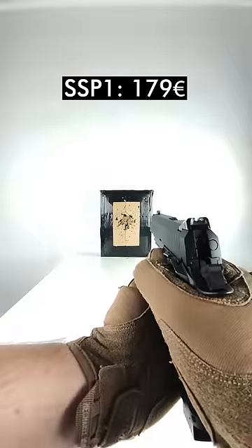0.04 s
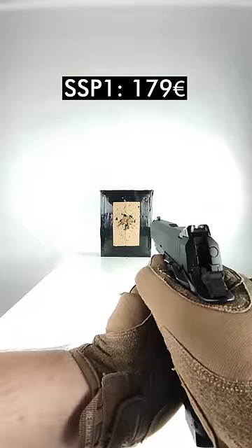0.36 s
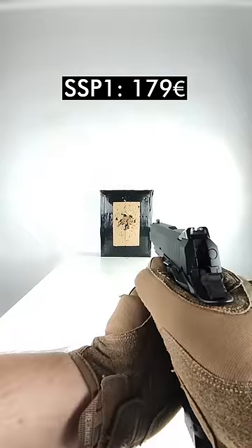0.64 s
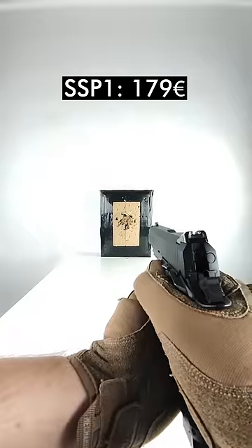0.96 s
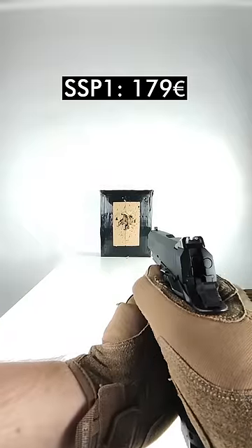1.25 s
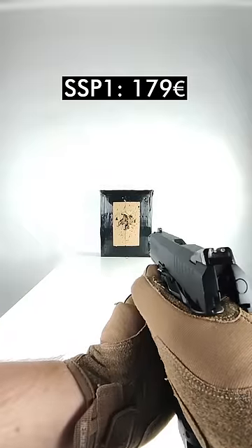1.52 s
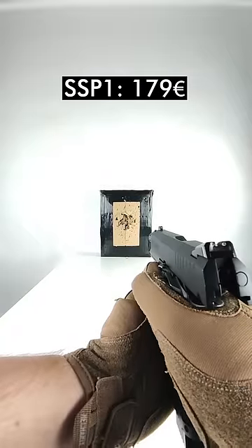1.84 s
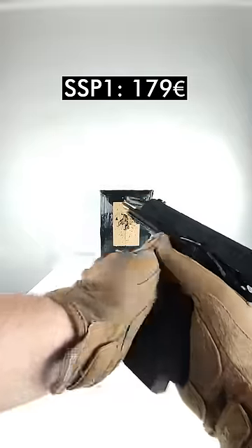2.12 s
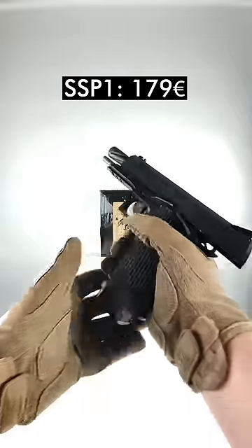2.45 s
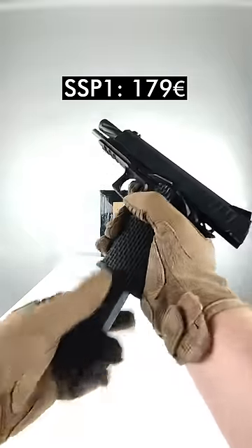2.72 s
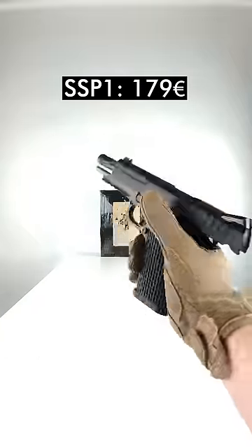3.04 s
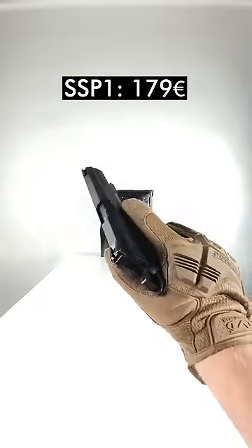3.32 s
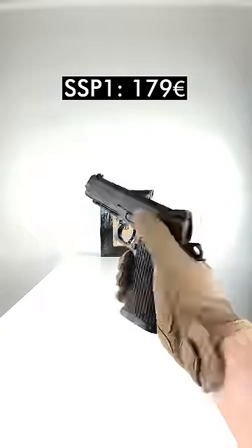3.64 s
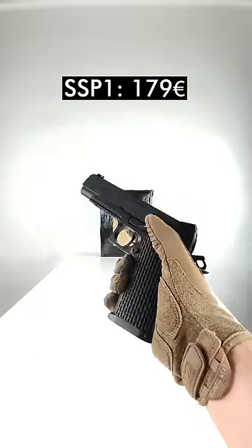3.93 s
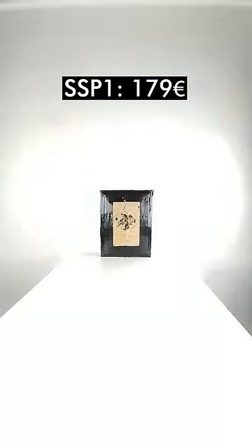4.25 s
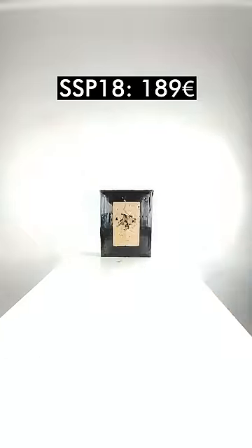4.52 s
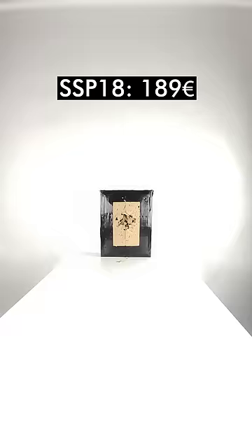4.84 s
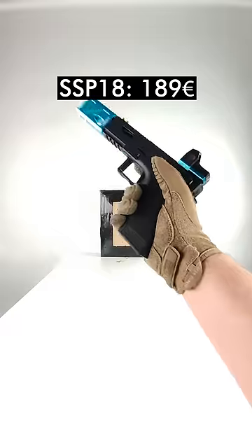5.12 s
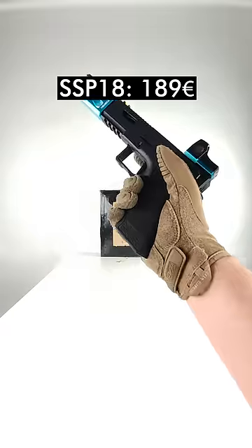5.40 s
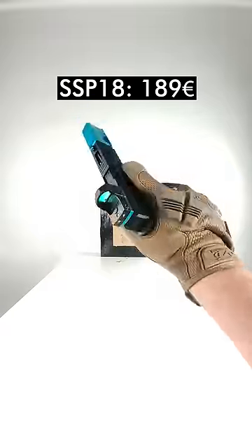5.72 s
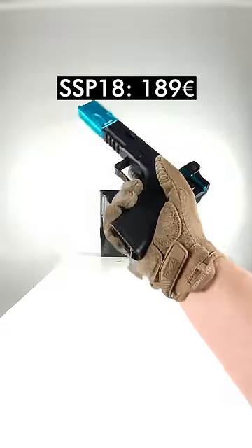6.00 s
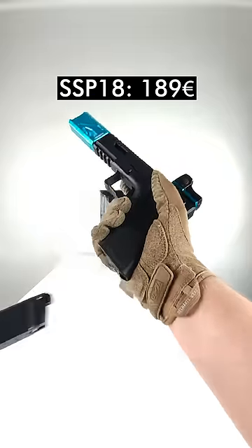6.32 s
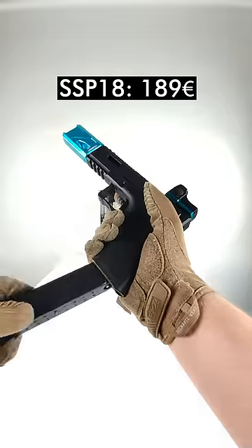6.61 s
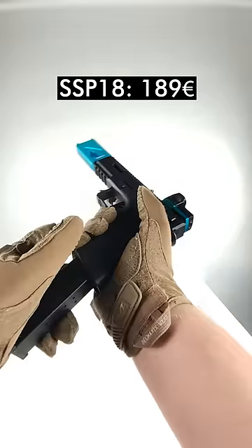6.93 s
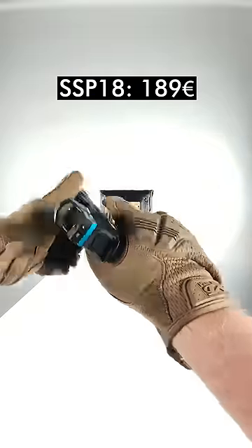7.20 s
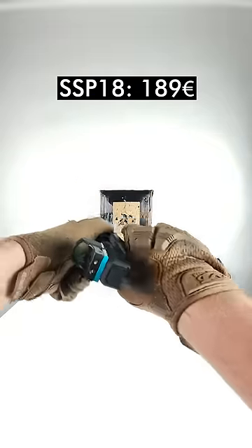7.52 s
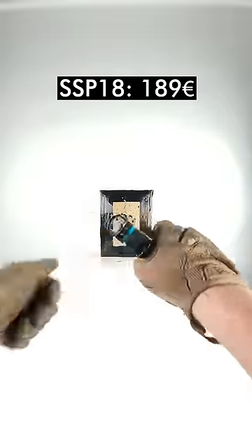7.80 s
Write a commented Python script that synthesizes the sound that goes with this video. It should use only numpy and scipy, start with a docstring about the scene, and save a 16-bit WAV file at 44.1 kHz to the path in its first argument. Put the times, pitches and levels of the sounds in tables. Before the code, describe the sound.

A low, quiet ventilation rumble fills a small room throughout. At about 1.1 seconds a gas-powered toy pistol fires close by with a sharp pop and a slide clack. The trigger resets with a dry click at 1.3 seconds, and a second shot pops at 1.5. From 2 to 3 seconds gloves rub and the magazine scrapes out with small clicks. At 3.3 seconds the slide snaps shut with a loud metallic clack and a brief room echo. Only faint rustles and ticks follow until about 6.5 seconds, as a second pistol is picked up. Its magazine knocks and scrapes into the grip from 6.6 seconds and locks with a loud click just before 7. The slide is pulled back with a quick cluster of clacks around 7.5 seconds and let go with another clack at 7.8.

```python
"""Gas-powered toy pistols, an arm's length away in a small room with rumbling ventilation.
First come two shots: each puff of gas bangs and throws the slide back, where it stays the second time.
Next the magazine rubs its way out and the slide snaps shut. Then a second pistol is picked up and its
magazine clicks in. Last, its slide is pulled back and let go. After each loud clack a limiter holds
the volume down for a moment, and then the room's ring jumps back up."""
import sys
import numpy as np
from scipy import signal
from scipy.fft import rfft, irfft
from scipy.io import wavfile
from scipy.ndimage import uniform_filter1d, minimum_filter1d

SR = 44100
rng = np.random.default_rng(int(sys.argv[2]) if len(sys.argv) > 2 else 0)


def to_wav(s):
    """Save 16-bit WAV."""
    ch = np.atleast_2d(s).T  # columns
    pcm = np.round(np.clip(ch, -1, 1) * 32767)  # PCM
    wavfile.write(sys.argv[1], SR, pcm.astype(np.int16))


N = 351036
HIT_SAMPLES = 8192
HIT_TIME_S = np.arange(HIT_SAMPLES) / SR

# In the tables, fade_s is the time to fall by 60 dB and decay_s the time to fall to about a third.
# pan_db is left minus right, bright_db adds treble, and room_db is how strongly a sound feeds the room.
# Tone of the ventilation: pitch_hz, relative_db
VENT_TONE = [(20, -1.5), (38, -4.5), (60, -20.5), (110, -17), (150, -15), (190, -17.5), (300, -18.5),
             (550, -20.5), (850, -29.5), (1200, -32), (2000, -38.5), (5000, -45.5), (10000, -49.5),
             (16000, -47.5)]
# The room's echo, band by band: pitch_hz, level_db, fade_s
ECHO_BANDS = [(60.75, -8, .36), (150, -6, 0.52), (300, -5.5, 0.44), (554, -7, 0.37), (990, -12.5, 0.31),
              (2000, -11, 0.26), (3960, -7.5, 0.24), (9100, -13, 0.22), (11000, -5.5, 0.14),
              (16000, -14.5, .15)]
# Pitches that the walls boost or weaken: pitch_hz, width_hz, boost_db
STANDING_WAVES = [(152.2, 5, 11), (257, 18, 1.5), (323, 12, 5.5), (405, 9.8, 8), (488.3, 75, 3),
                  (535, 38, 2), (623, 22, 4), (782, 22, 4.5), (860, 13, -4.5)]
# Tone of sliding surfaces: pitch_hz, relative_db
RUB_TONE = [(200, -14), (800, -4.5), (1400, 5), (1800, 1.5), (2500, 3), (3700, -0.5), (4600, -2),
            (7000, 1.5), (9200, 4), (10500, -6), (16000, -14.5)]
# Gloves, magazine and slide rubbing along: middle_s, length_s, level_db, bright_db
RUB_STROKES = [(2.04, 0.093, -55.5, -5), (2.377, .13, -52.5, -6), (2.698, 0.046, -49.5, -11),
               (2.746, .06, -41.5, 4.5), (2.837, 0.069, -48, 4), (2.909, 0.074, -54.5, 1),
               (3.073, 0.12, -58.5, -6), (4.28, 0.14, -67, 4.5), (4.93, 0.11, -66, -9),
               (5.201, 1, -72.5, -2), (6.234, 0.12, -66.5, 4), (6.449, 0.32, -67, 5),
               (6.65, 0.021, -47.5, 0), (6.874, .065, -59.5, -6), (6.927, 0.07, -39, 6),
               (7.136, 0.052, -60.5, -2), (7.277, 0.23, -61, -0.5), (7.506, 0.047, -54, -1),
               (7.783, 0.077, -48, 2.5)]
# Clacks that jolt the whole pistol: start_s, level_db, decay_s, pan_db
PISTOL_JOLTS = [(1.3055, -18, 0.0028, 24), (3.288, 0.5, 0.018, 4), (6.9645, -7.5, 0.0094, 4.5),
                (7.547, -9, .011, 1.5), (7.827, -17, 0.011, 5)]
# Tone of the pistol's frame, also used for the gas hiss: pitch_hz, relative_db
FRAME_TONE = [(60, -10), (250, -1.5), (520, 0.5), (800, -2.5), (1400, -1.5), (2500, -1), (4500, 0.5),
              (7000, -2), (9200, 1.5), (10500, -6.5), (16000, -9)]
# Ringing notes of slide and barrel: pitch_hz, level_db, fade_s
METAL_NOTES = [(1760, -39, .08), (2350, -34, .08), (2620, -37, .07), (3260, -36, .1), (3850, -37, .08),
               (4420, -37, .08), (5320, -37, .08), (6000, -33, .08), (6430, -33, .09), (7240, -37, .1),
               (7980, -36, .08), (9200, -34, .08)]
# Kinds of clack, each named for one part that sounds like it; the first is any sharp, dry click of
# the action (the firing mechanism): knock_db, rise_s, fade_s, list of peaks (pitch_hz, boost_db)
CLACK_KINDS = {"hammer": (0.82, 0.00054, 0.013, [(1200, 3), (8900, 0.5)]),
               "slide": (0, 0.00056, 0.014, [(7000, 1.5), (9400, 2)]),
               "chamber": (-19, 0.00025, .015, [(2950, 11), (4300, 3.5), (6200, 11), (9300, 8)]),
               "barrel": (-18, 0.00061, 0.014, [(1720, 15.5)]), "catch": (-4, .001, 0.0083, [(4200, 0.5),
               (5900, 5)]), "grip": (6.5, .0006, 0.028, [(1370, 16.5)]),
               "well": (5.4, 0.00061, 0.014, [(2500, 4.5)]), "magazine": (-18, 0.0013, 0.012, [(1800, 3.5),
               (2400, 8), (6400, 3)]), "frame": (-13.5, 0.00058, 0.016, [(1800, 4), (3250, 4.5),
               (6300, 2.5)])}
# Parts knocked together by a spring or a hand: start_s, kind, level_db, bright_db, room_db, pan_db
# The row at 1.306 s is the action: a sharp, dry click as the trigger resets.
HANDLING_CLACKS = [ (1.113, "slide", 3, 4, 1.5, 3), (1.306, "hammer", -16, 6.5, -7.5, -1),
                   (1.319, "catch", -43, 6, -6, 0), (1.489, "catch", -52, -8, 2, -4.5),
                   (1.496, "catch", -43.5, -3, -9, -4), (1.941, "catch", -35.5, 1, 2, -3),
                   (1.964, "catch", -37.5, -9.5, -12, -1.5), (2.08, "catch", -27, 7, -2.5, 0.5),
                   (2.5728, "catch", -47.5, -2, 7, -7), (2.698, "grip", -41, -11, 1, -1),
                   (2.7954, "grip", -31, -12, -5, .5), (2.809, "grip", -34.5, -6.5, .5, 3),
                   (2.849, "grip", -26.5, -8, -10, -2), (2.898, "catch", -40, -13, 1.5, -6),
                   (2.907, "catch", -34.5, -6, -6, 3), (3.2166, "catch", -37, 2.5, 4.5, 2),
                   (3.2532, "chamber", -24.5, -0.5, 10, -0.5), (3.2708, "chamber", 5.5, 5.5, 2.5, -0.5),
                   (3.2873, "slide", 4.5, 10.5, -7.5, 2), (3.713, "grip", -42.5, -10, 5, -6),
                   (3.728, "grip", -37, 5, -1, 0.5), (4.174, "catch", -43, -7.5, -1, -3),
                   (4.2458, "catch", -48, -20, -7, -2), (5.116, "catch", -53.5, -9, 0, 0),
                   (5.2913, "catch", -49.5, -13, 4, -1), (5.5835, "catch", -51, -6.5, 10, 4),
                   (5.661, "catch", -49.5, 2.5, 5, -2.5), (5.6818, "magazine", -48, -13, -1, 7),
                   (6.0754, "catch", -37, -9, 3.5, 2.5), (6.5964, "well", -30.5, -8.5, -13, 0),
                   (6.602, "well", -26, -14, 0, 1), (6.633, "magazine", -35.5, -11, -6, 0),
                   (6.6572, "well", -21.5, -9, -10, -2), (6.6701, "magazine", -11, -6.5, -4.5, 0),
                   (6.699, "well", -32.5, -9, 6, -1), (6.8943, "magazine", -32.5, -10, -6.5, 1.5),
                   (6.912, "well", -26, 1, -10, -1.5), (6.9402, "magazine", -4.5, 4.5, -7.5, 0.5),
                   (6.946, "catch", -14.5, 6, -16, -2), (6.9627, "magazine", 3, -3, -6.5, 3.5),
                   (7.061, "magazine", -38, -4, -1, 0), (7.312, "catch", -47, -1, 3, 2),
                   (7.489, "chamber", -34.5, 6, -5, -2.5), (7.504, "catch", -34, -3, 10, 0),
                   (7.5192, "chamber", -15, 6.5, 2, 0.5), (7.5296, "barrel", -12.5, -3, -22, -1),
                   (7.546, "frame", -4, 0.5, -1.5, 0.5), (7.5493, "frame", -2, 2, -11, 1.5),
                   (7.567, "frame", -19, -8, 3, 6), (7.8, "frame", -34, 1, 15, -2),
                   (7.814, "chamber", -17, 5, 14, 0), (7.8266, "frame", -5, -0.5, -4.5, 2)]
# With each shot the trigger moves, the hammer is freed and hits the gas valve, and the slide flies back:
# after_bang_s, kind, level_db, bright_db, room_db, pan_db
SHOT_CLACKS = [(-.021, "grip", -43.5, -1.5, -4.5, -1.5), (-.013, "hammer", -29.5, -2, 0, -4),
               (-.0083, "hammer", -7.5, 3, -2, -0.5), (.0085, "slide", 4.5, 7, 5.5, 0)]
# Tone of the gas leaving the barrel: pitch_hz, relative_db
BANG_TONE = [(60, 9.5), (160, 2), (280, 8), (420, 5.5), (550, 5), (760, 9), (1050, 6.5), (1400, 2.5),
             (2200, -1.5), (5000, -8.5), (9000, 5.5), (10500, -7), (16000, -17.5)]
# The shots: start_s, bang_db, fade_s, hiss_db, thump_db, thump_decay_s, thump_pan_db
GAS_SHOTS = [(1.0715, 6, 0.055, -6, -4, .017, 10), (1.546, 5, 0.096, -6, 5, 0.015, 3)]


def gain(db):
    """Turn decibels into a number to multiply by."""
    return 10 ** (np.asarray(db) / 20)


def pitches(size):
    """The pitches in Hz that make up a sound of this many samples."""
    return np.maximum(np.arange(size // 2 + 1) * SR / size, 1)


def curve(points, hz):
    """Join (pitch, value) points with straight lines on a musical scale."""
    points = np.array(points, float)
    return np.interp(np.log(hz), np.log(points[:, 0]), points[:, 1])


def colour(x, db):
    """Turn each pitch up or down, so that any ringing follows the sound and never leads it."""
    size = x.shape[-1]
    cepstrum = irfft(db * np.log(10) / 20, size)
    cepstrum[1:size // 2] *= 2
    cepstrum[size // 2 + 1:] = 0
    return irfft(rfft(x) * np.exp(rfft(cepstrum)), size)


def same_power(db):
    """Shift a tone curve so that white noise keeps its power."""
    return db - 10 * np.log10(np.mean(gain(db) ** 2))


def stereo_noise(size, alike_below_hz, treble_alike):
    """Noise whose left and right are alike in the bass, less so in the treble."""
    shared, opposite = rfft(rng.standard_normal((2, size)))
    alike = treble_alike + (.85 - treble_alike) / (1 + (pitches(size) / alike_below_hz) ** 2)
    sides = np.array([[1], [-1]]) * opposite * np.sqrt((1 - alike) / 2)
    return irfft(shared * np.sqrt((1 + alike) / 2) + sides, size)


def fade(t, fade_s):
    """Die away, falling by 60 dB every fade_s."""
    return np.exp(-np.log(1000) * t / fade_s)


def panned(x, db):
    """Lean a sound to the left by some decibels."""
    return x * gain(np.array([[db], [-db]]) / 2)


def add(out, start_s, x):
    """Mix a sound in at a given time."""
    i = max(int(start_s * SR), 0)
    out[:, i:i + x.shape[-1]] += x[..., :N - i]


def standing_waves_db(hz):
    """Waves bouncing between the walls pile up at some pitches and cancel at others."""
    return sum(db / (1 + (2 * (hz - pitch) / width) ** 2) for pitch, width, db in STANDING_WAVES)


def ventilation(level_db=-49):
    """Moving air rumbles steadily, coloured by the room's standing waves."""
    hz = pitches(N)
    tone_db = curve(VENT_TONE, hz) + standing_waves_db(hz)
    return gain(level_db) * colour(stereo_noise(N, 800, 0.045), same_power(tone_db))


def room_echo(x, size=32768, build_s=0.0013, standing_share=0.65):
    """Close walls give a blur of echoes that builds quickly and lasts longest in the bass."""
    t, hz = np.arange(size) / SR, pitches(size)
    noise, tail = rfft(stereo_noise(size, 680, 0)), 0
    for band_hz, db, fade_s in ECHO_BANDS:
        band = curve([(pitch, pitch == band_hz) for pitch, *_ in ECHO_BANDS], hz)  # 1 here, 0 elsewhere
        swell = fade(t, fade_s) * (1 - np.exp(-t / build_s))
        tail = tail + gain(db) * irfft(noise * band) * swell / np.linalg.norm(swell)
    tail = colour(tail, standing_share * standing_waves_db(hz))
    return signal.fftconvolve(x, tail, axes=1)[:, :N]


def rubs(size=65536, grain_samples=48):
    """Sliding surfaces catch and slip in tiny grains of sound."""
    out, hz = np.zeros((2, N)), pitches(size)
    t = (np.arange(size) - size / 2) / SR
    for middle_s, length_s, db, bright_db in RUB_STROKES:
        grit_db = max(2.5 + 0.02 * (db + 54.5), 0)  # harder rubbing is grittier
        slips = rng.standard_normal(size // grain_samples + 1)
        grains = gain(grit_db * np.repeat(slips, grain_samples)[:size])
        stroke = np.exp(-np.abs(2 * t / length_s) ** 3) * grains / np.sqrt(np.mean(grains ** 2))
        tone_db = curve(RUB_TONE, hz) + bright_db * curve([(2500, 0), (8000, 1)], hz)
        rub = colour(stereo_noise(size, 1500, 0.081) * stroke, same_power(tone_db))
        add(out, middle_s + t[0], gain(db) * rub)
    return out


def ticks(per_s=14, above_rub_db=9, spread_db=3.5, tries=16):
    """Loose parts click at random during each rub."""
    out = np.zeros((2, N))
    for middle_s, length_s, db, _ in RUB_STROKES:
        tick = clack("catch", db + above_rub_db, bright_db=-12)
        for chance, place, strength in rng.random((tries, 3)):
            if chance < per_s * length_s / tries:
                add(out, middle_s + length_s * (place - .5), tick * gain(spread_db * (2 * strength - 1)))
    return out


def thumps(rise_s=0.0018, dip_lead_s=.0065):
    """Sudden steps in air pressure: a shot pulls and then pushes, a jolt only pulls."""
    def step(db, decay_s, pan_db):
        pressure = (1 - np.exp(-HIT_TIME_S / rise_s)) * np.exp(-HIT_TIME_S / decay_s)
        return gain(db) * panned(pressure, pan_db)

    def leak(x, swing_hz):  # the pressure leaks away and swings back
        return signal.sosfilt(signal.butter(2, swing_hz, "high", fs=SR, output="sos"), x)

    gas, jolts = np.zeros((2, 2, N))
    for start_s, *_, db, decay_s, pan_db in GAS_SHOTS:
        add(gas, start_s - dip_lead_s, -step(db=-11.5, decay_s=.007, pan_db=pan_db))
        add(gas, start_s, step(db, decay_s, pan_db))
    for start_s, *jolt in PISTOL_JOLTS:
        add(jolts, start_s, -step(*jolt))
    return leak(gas, swing_hz=1.8) + leak(jolts, swing_hz=4.3)


def metal_ring(detune=0.0016):
    """The struck slide and barrel ring with pure notes, tuned a little differently on each hit."""
    hz, db, fade_s = np.array(METAL_NOTES).T[:, :, None]
    hz = hz * (1 + detune * rng.standard_normal(hz.shape))
    notes = gain(db) * fade(HIT_TIME_S, fade_s) * np.sin(2 * np.pi * hz * HIT_TIME_S)
    flips = rng.choice([-1, 1], (2, len(hz)))  # each side gets each wave upright or upside down
    return flips @ notes


def clack(kind, db, bright_db, rattle_db=-25, rattle_fade_s=0.083, metal_db=-3, peak_width=.11):
    """A knock shakes the frame; the hand soon stills it, while the metal rings on faintly."""
    knock_db, rise_s, fade_s, peaks = CLACK_KINDS[kind]
    t, hz = HIT_TIME_S, pitches(HIT_SAMPLES)
    bass_db = knock_db * curve([(750, 0.69), (1700, 0.032)], hz)
    treble_db = bright_db * curve([(3500, 0.028), (8000, 1.0)], hz)
    peaks_db = sum(boost / (1 + (np.log(hz / pitch) / peak_width) ** 2) for pitch, boost in peaks)
    tone_db = curve(FRAME_TONE, hz) + bass_db + treble_db + peaks_db
    shake = (1 - np.exp(-t / rise_s)) * (fade(t, fade_s) + gain(rattle_db) * fade(t, rattle_fade_s))
    frame = colour(stereo_noise(HIT_SAMPLES, 1600, 0.032) * shake, same_power(tone_db))
    return (frame + gain(metal_db) * metal_ring()) * gain(db) / shake.max()


def pressure_pulse(start_s, width_s):
    """One rounded push of air whose samples add up to 1; wider sounds duller."""
    age_s = np.maximum(HIT_TIME_S - start_s, 0)
    pulse = age_s * np.exp(-age_s / width_s)
    return pulse / pulse.sum()


def gas_bang(db, fade_s, hiss_db, jet_db=-4, hiss_fade_s=0.094):
    """Gas cracks, pops as the pellet leaves and rushes out behind it; more hisses from the slide."""
    hz = pitches(HIT_SAMPLES)
    crack = 13 * pressure_pulse(start_s=0, width_s=.00005)
    pop = 11 * pressure_pulse(start_s=.0017, width_s=.00011)
    jet = gain(jet_db) * stereo_noise(HIT_SAMPLES, 2000, 0.17) * fade(HIT_TIME_S, fade_s)
    bang = colour(crack + pop + jet, same_power(curve(BANG_TONE, hz)))
    escaping = stereo_noise(HIT_SAMPLES, 1000, .05) * fade(HIT_TIME_S, hiss_fade_s)
    hiss = colour(escaping, same_power(curve(FRAME_TONE, hz)))
    return gain(db) * bang + gain(hiss_db) * hiss


def scene(thump_room_db=-18):
    """Mix the pistols close by, their echo and the ventilation."""
    near, pressure = rubs() + ticks(), thumps()
    to_walls = near + gain(thump_room_db) * pressure
    for start_s, db, fade_s, hiss_db, *_ in GAS_SHOTS:
        sound = gas_bang(db, fade_s, hiss_db)
        add(near, start_s, sound)
        add(to_walls, start_s, sound)
    firing = [(shot_s + after_s, *hit) for shot_s, *_ in GAS_SHOTS for after_s, *hit in SHOT_CLACKS]
    for start_s, kind, db, bright_db, room_db, pan_db in firing + HANDLING_CLACKS:
        sound = clack(kind, db, bright_db)
        add(near, start_s, panned(sound, pan_db))
        add(to_walls, start_s, sound * gain(room_db))
    return near + pressure + room_echo(to_walls) + ventilation()


def limiter(x, limit_db=-10.0, hold_s=0.073, sense_s=0.0013, smooth_s=0.00091):
    """Turn the volume down at once for a loud peak, hold it there, then let go quickly."""
    power = uniform_filter1d(np.mean(x ** 2, axis=0), int(sense_s * SR))
    volume = gain(limit_db) / np.sqrt(np.maximum(power, gain(limit_db) ** 2))
    half_hold = int(hold_s * SR) // 2
    held = minimum_filter1d(volume, 2 * half_hold + 1, origin=half_hold)
    return x * uniform_filter1d(held, int(smooth_s * SR))


def record(dry, top_hz=15900):
    """Limit the volume, clip any peaks still too big and cut off the highest treble."""
    treble_cut = signal.ellip(10, .2, 70, top_hz, fs=SR, output="sos")
    return signal.sosfilt(treble_cut, np.clip(limiter(dry), -1, 1))


dry = scene()
out = record(dry)
to_wav(out)
```